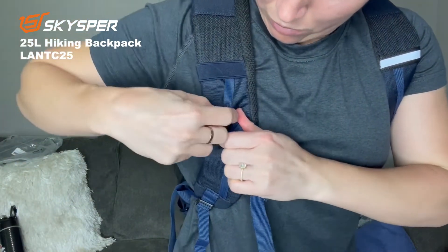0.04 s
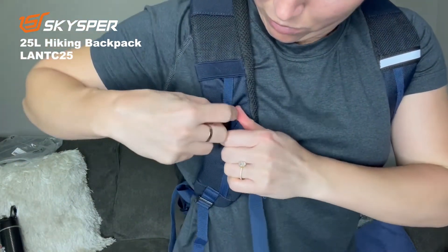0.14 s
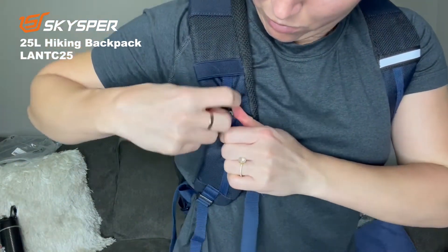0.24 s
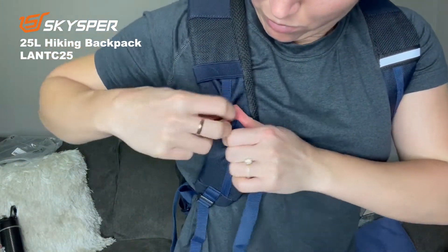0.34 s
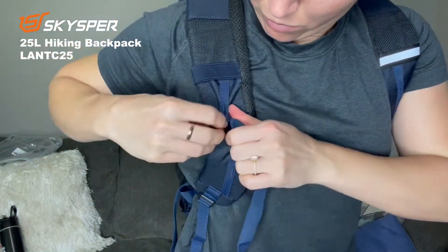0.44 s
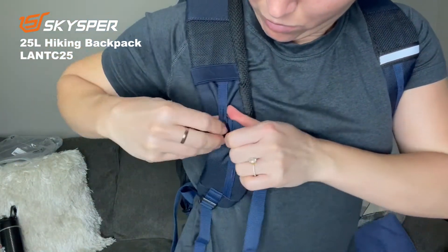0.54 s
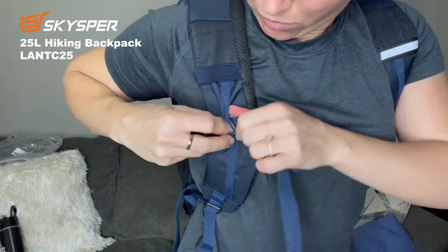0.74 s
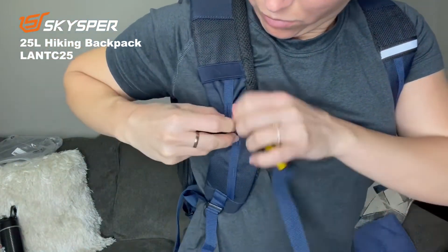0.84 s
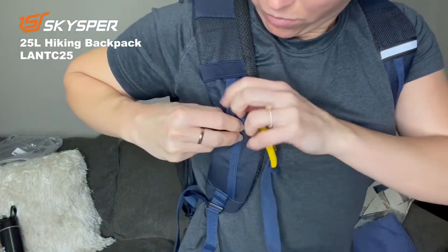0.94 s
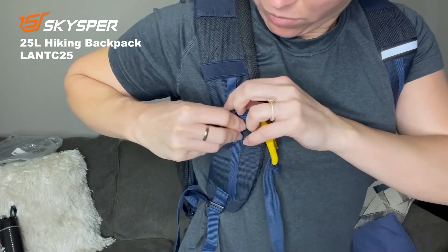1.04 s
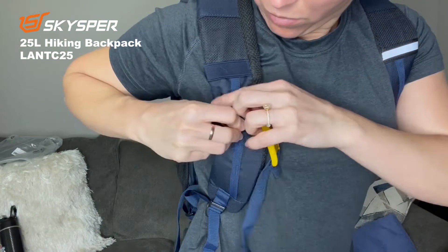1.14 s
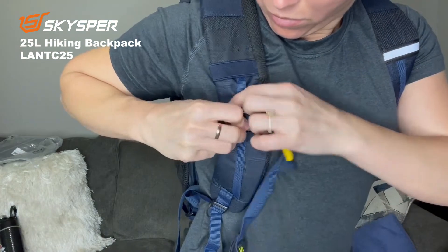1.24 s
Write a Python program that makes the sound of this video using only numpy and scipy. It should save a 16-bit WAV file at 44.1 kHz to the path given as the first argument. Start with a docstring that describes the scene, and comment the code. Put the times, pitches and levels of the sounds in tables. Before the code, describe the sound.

Close to the microphone indoors, a backpack's plastic chest buckle makes one hard snap. Smaller ticks follow as fingers handle it, with soft strap rustling and muffled hand bumps over a faint room tone.

```python
"""Strap buckle at the chest

Close up, on a camera's two-port microphone in a furnished room, hands work a plastic buckle and nylon
webbing. The buckle snaps once, hard enough to clip, then knocks and ticks. The webbing rubs and hisses
between the fingers, and the hands bump softly on the padded strap, over a faint room tone."""
import sys
import numpy as np
from scipy import signal
from scipy.fft import rfft, irfft, next_fast_len
from scipy.io import wavfile

SR = 44100
rng = np.random.default_rng(int(sys.argv[2]) if len(sys.argv) > 2 else 0)


def master_out(mix):
    """Clip the mix to full scale and print it as 16-bit PCM to the path in sys.argv[1]."""
    frames = np.transpose(np.atleast_2d(mix))
    ceiling = np.clip(frames, -1, 1)
    pcm = np.round(ceiling * 32767).astype(np.int16)
    wavfile.write(sys.argv[1], SR, pcm)


N = 57330

# room tone: (frequency [Hz], relative level [dB])
ROOM_TONE_SPECTRUM = [(30, -9), (50, 14), (110, -2), (200, -11.5), (330, -19), (450, -26), (650, -22),
                      (1000, -7), (2200, -19), (3500, -18.5)]
# reverberation of the furnished room: (frequency [Hz], time to fall 60 dB [s])
ROOM_DECAY = [(150, 0.67), (400, 0.33), (900, 0.46), (1500, 0.55), (2500, 0.56), (4000, 0.31),
              (12000, 0.29)]
# colour at the start of the reverberation: (frequency [Hz], relative level [dB])
ROOM_SPECTRUM = [(150, 14), (400, 17.5), (950, -5.5), (1500, -5), (2400, -1), (3200, 0.5), (6000, -0.5),
                 (12000, -13)]
# a close source at the two microphone ports: (frequency [Hz], phase lead of the left [rad])
PORT_PHASE = [(0, 0), (6400, -5.6), (8200, -3.1), (12800, 3.1), (16500, 7.6)]
# hands pressing on padded strap and chest: (time [s], level [dB])
HAND_BUMPS = [(0.062, -57), (.1, -71), (0.209, -40), (0.252, -41.5), (0.368, -51.5), (.735, -48),
              (0.781, -56.5), (.99, -59.5), (1.109, -63), (1.188, -63.5)]
# their muffled colour: (frequency [Hz], relative level [dB])
BUMP_SPECTRUM = [(70, -6.5), (150, -12.5), (250, -6), (400, -7)]
# rough, hollow scrapes: (start [s], length [s], level [dB], centre [Hz], width [Hz])
SCRAPE_STROKES = [(0.1998, 0.0033, -17, 2200, 1190), (0.243, 0.043, -33.5, 896, 119),
                  (0.719, 0.0079, -42, 1400, 900), (1.166, 0.042, -37.5, 1470, 915),
                  (1.246, 0.044, -47, 1600, 900)]
# webbing moving in the fingers: (time [s], rub level [dB], hiss level [dB])
WEBBING_LEVELS = [(0, -49.5, -53.5), (0.029, -77, -61.5), (.15, -71, -62), (.3, -47, -59.5),
                  (.45, -54.5, -58), (0.552, -62, -61.5), (0.619, -50.5, -51.5), (.7, -44, -48.5),
                  (0.798, -42.5, -51.5), (0.922, -61.5, -59), (0.971, -41, -43.5), (1.078, -49, -51),
                  (1.2, -54, -48), (1.3, -70.5, -67)]
# short swishes of the strap: (start [s], length [s], rub level [dB], hiss level [dB])
STRAP_SWISHES = [(0, 0.007, -45, -77), (.05, 0.059, -49, -54.5), (0.186, 0.044, -41, -59.5),
                 (0.365, 0.028, -49, -48), (0.645, 0.028, -47, -65), (.726, 0.025, -37, -48),
                 (0.98, 0.022, -42.5, -40), (1.11, .012, -48, -49), (1.168, .032, -51, -53.5),
                 (1.245, 0.057, -61, -53.5)]
# strap rubbing on cloth: (frequency [Hz], relative level [dB])
RUB_SPECTRUM = [(520, -17), (650, -9), (900, -7), (1600, -4), (2300, -12.5), (3500, -10.5), (5000, -21)]
# hiss of the weave: (frequency [Hz], relative level [dB])
HISS_SPECTRUM = [(2000, -16), (3500, 0), (5000, -3), (6500, -1.5), (8500, -4.5), (10500, -4.5),
                 (13000, -10), (16000, -10.5)]
# hard plastic edges meeting: (time [s], level [dB])
EDGE_TICKS = [(.2051, -9), (.2055, -7), (.7412, -33), (.7846, -36), (.9846, -3), (1.1005, -38),
              (1.1118, -22)]
# their bright colour: (frequency [Hz], relative level [dB])
TICK_SPECTRUM = [(2500, -25), (4000, -5), (5200, -2.5), (6300, 4), (7500, 4), (10500, 1), (13000, -1.5),
                 (15800, -6)]
# resonances of the buckle body: (centre [Hz], width [Hz], relative level [dB])
BUCKLE_MODES = [(880, 437, 18), (1600, 480, -5), (2200, 1200, -16.5), (562, 67, 10)]
# buckle contacts: (time [s], peak level [dB], pitch [ratio], left minus right [dB])
BUCKLE_KNOCKS = [(.0027, -54, 1.7, 2), (0.0575, -33, 1.05, -20), (0.0637, -34, 1.02, 1),
                 (0.0864, -27.5, 1.3, -3.5), (0.104, -42, 0.97, -15), (0.1065, -42, 0.83, 0),
                 (0.1676, -33.5, 1.36, -4), (0.2052, 6, 1.074, -1.5), (.6505, -32, 0.85, -4),
                 (.718, -18, 0.97, -3), (0.7409, -17, 1.3, -5), (0.7706, -22, 1.13, 2),
                 (0.7845, -10.5, 1.06, -5.5), (0.9851, -22, 1.37, -7), (1.0372, -19, 1.043, -2.5),
                 (1.0998, -20.5, 2.64, -1.5), (1.1125, -31, 1.03, -10.5), (1.137, -32.5, 1.64, -7),
                 (1.165, -30, 1.24, -3), (1.1946, -24, 1.16, -5), (1.2857, -34.5, 1.5, -5)]


def amp(db):
    """Decibels to gain."""
    return 10 ** (np.asarray(db) / 20)


def unit(x):
    """x scaled to rms 1."""
    return x / np.sqrt(np.mean(x ** 2) + 1e-20)


def along(points, hz):
    """A (frequency, value) curve read at hz, on a log frequency axis."""
    point_hz, values = np.transpose(points)
    return np.interp(np.log(hz + 1), np.log(point_hz + 1), values)


def filtered(x, response):
    """x through a complex frequency response."""
    size = next_fast_len(x.shape[-1] + 8192)
    hz = np.fft.rfftfreq(size, 1 / SR)
    return irfft(rfft(x, size) * response(hz), size)[..., :x.shape[-1]]


def coloured(x, spectrum):
    """x shaped by a spectrum that falls steeply beyond both ends, at rms 1."""
    closed = [(spectrum[0][0] / 2, -90)] + list(spectrum) + [(spectrum[-1][0] * 2, -90)]
    return unit(filtered(x, lambda hz: amp(along(closed, hz))))


def resonance(hz, centre_hz, width_hz):
    """Response of one damped resonance."""
    return 1j * hz * width_hz / (centre_hz ** 2 - hz ** 2 + 1j * hz * width_hz)


def room_tone():
    """The room's faint low hush, partly shared by left and right."""
    left, right, shared = rng.standard_normal((3, N))
    return coloured(np.array([left + 0.54 * shared, right + 1.4 * shared]), ROOM_TONE_SPECTRUM)


def room_reverb(x, gap_s=0.002):
    """The room answers behind the close sound, each frequency dying at its own speed."""
    hz, t, noise = signal.stft(rng.standard_normal((2, SR // 2)), SR, nperseg=256)
    tail_db = along(ROOM_SPECTRUM, hz)[:, None] - 60 * t / along(ROOM_DECAY, hz)[:, None]
    tail = signal.istft(noise * amp(tail_db), SR, nperseg=256)[1]
    delayed = np.pad(x.mean(0), (round(gap_s * SR), 0))
    return signal.fftconvolve(delayed[None], tail / np.linalg.norm(tail[0]), axes=1)[:, :N]


def hand_bumps(rise_s=0.01):
    """Low muffled noise swells and dies with each press of the hand."""
    t, gain = np.arange(N) / SR, np.zeros(N)
    for start, db in HAND_BUMPS:
        age = np.clip((t - start) / rise_s, 0, 50)
        gain += amp(db) * age * np.exp(1 - age)
    return gain * coloured(rng.standard_normal(N), BUMP_SPECTRUM)


def friction(grain_share, grains_per_s=2500, spread_db=3):
    """Fibres catch at random moments, mixed with smooth sliding noise."""
    catches = rng.random(N) < grains_per_s / SR
    grains = catches * amp(spread_db * rng.exponential(size=N)) * rng.standard_normal(N)
    return grain_share * unit(grains) + (1 - grain_share) * rng.standard_normal(N)


def scrapes():
    """Grainy friction through a hollow resonance, under a rounded stroke."""
    t, out = np.arange(N) / SR, np.zeros(N)
    for start, length, db, centre, width in SCRAPE_STROKES:
        stroke = np.sin(np.pi * np.clip((t - start) / length, 0, 1))
        hollow = filtered(friction(grain_share=0.6), lambda hz: resonance(hz, centre, width) ** 2)
        out += amp(db) * stroke * unit(hollow)
    return out


def webbing(rise_s=0.0076, fall_s=0.012, diffuse_db=-5):
    """The strap rubs on cloth and its weave hisses; returns the close sound and a diffuse hiss."""
    t = np.arange(N) / SR
    times, rub_db, hiss_db = np.transpose(WEBBING_LEVELS)
    gains = amp([np.interp(t, times, rub_db), np.interp(t, times, hiss_db)])
    for start, length, *levels in STRAP_SWISHES:
        ramp = np.minimum((t - start) / rise_s, (start + length - t) / fall_s)
        gains += amp(levels)[:, None] * np.clip(ramp + 0.5, 0, 1) ** 2
    rub_gain, hiss_gain = gains
    rub = rub_gain * coloured(friction(grain_share=0.6), RUB_SPECTRUM)
    diffuse = amp(diffuse_db) * hiss_gain * coloured(rng.standard_normal((2, N)), HISS_SPECTRUM)
    hiss = hiss_gain * coloured(friction(grain_share=0.35), HISS_SPECTRUM)
    return rub * amp([[-1.2], [1.2]]) + hiss, diffuse  # the rub sits slightly right


def buckle_ticks(rattle_db=-4.5, rattle_t60_s=0.0025):
    """Hard edges meet in a bright click with a very short rattle."""
    t, clicks = np.arange(2048) / SR, np.zeros(N + SR)
    for start, db in EDGE_TICKS:
        rattle = amp(rattle_db - 60 * t / rattle_t60_s) * rng.standard_normal(len(t))
        clicks[round(start * SR):][:len(t)] += amp(db) * ((t == 0) + rattle)
    ticks = coloured(clicks, TICK_SPECTRUM)
    return ticks[:N] * clicks.max() / abs(ticks).max()


def buckle_response(hz, pitch):
    """The soft push of plastic on plastic rings the body; the hard rim keeps its own pitch."""
    push = resonance(hz / pitch, centre_hz=1400, width_hz=3490) ** 4
    body = sum(amp(db) * resonance(hz / pitch, centre, width) for centre, width, db in BUCKLE_MODES)
    rim = amp(-17) * resonance(hz, centre_hz=4200, width_hz=1000) ** 3
    return push * body + rim


def buckle_knocks():
    """Each contact knocks the buckle at its own pitch and stereo position; the hardest is the snap."""
    out = np.zeros((2, N + SR))
    for start, db, pitch, pan_db in BUCKLE_KNOCKS:
        knock = filtered(signal.unit_impulse(2048), lambda hz: buckle_response(hz, pitch))
        gains = amp([[db + pan_db / 2], [db - pan_db / 2]])
        out[:, round(start * SR):][:, :len(knock)] += gains * knock / abs(knock).max()
    return out[:, :N]


def microphone_ports(x):
    """A close source reaches the two ports with a phase offset that depends on frequency."""
    port_hz, lead = np.transpose(PORT_PHASE)
    sides = np.array([[1], [-1]])
    return filtered(x, lambda hz: np.exp(0.5j * np.interp(hz, port_hz, lead) * sides))


def scene():
    """Buckle, webbing and hands right at the microphone, with the room behind them."""
    strap, diffuse_hiss = webbing()
    close = buckle_knocks() + buckle_ticks() + strap + scrapes()
    background = amp(-51) * room_tone()
    direct = microphone_ports(close + hand_bumps())
    return direct + amp(-6.5) * room_reverb(close) + diffuse_hiss + background


def record(dry):
    """The camera's input clips near full scale; then the deep bass and the top treble are cut."""
    low_cut_hz, top_hz = 130, 16400
    clipped = np.clip(dry, -0.96, 0.96)
    return filtered(clipped, lambda hz: (hz < top_hz) * (1j * hz / (low_cut_hz + 1j * hz)) ** 2)


dry = scene()
out = record(dry)
master_out(out)
```